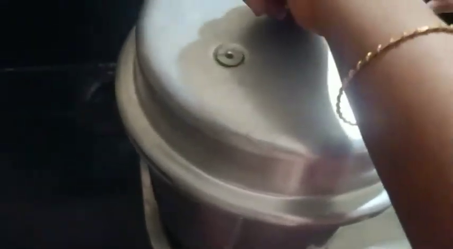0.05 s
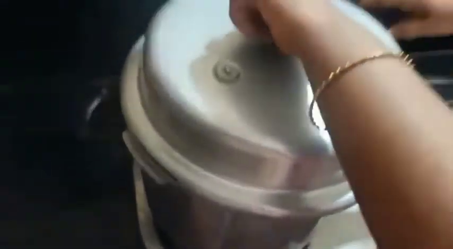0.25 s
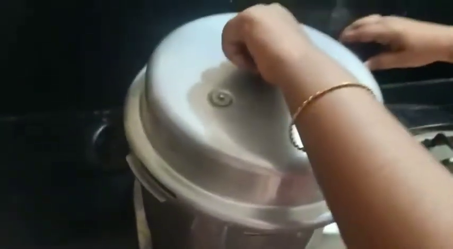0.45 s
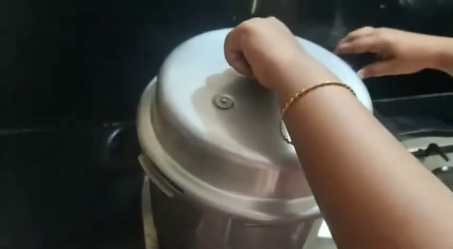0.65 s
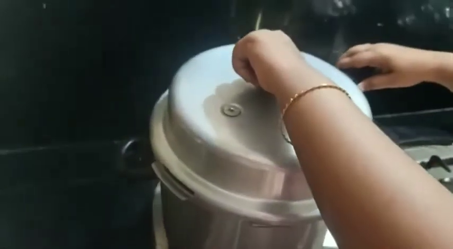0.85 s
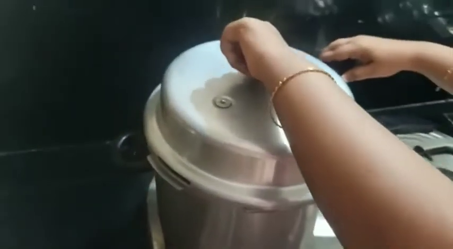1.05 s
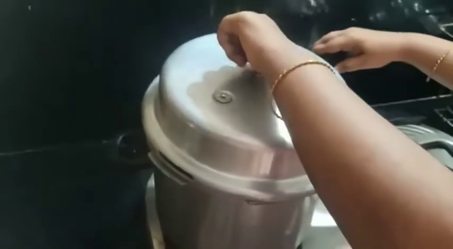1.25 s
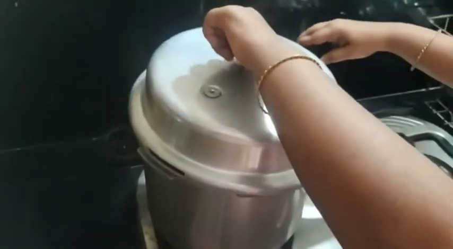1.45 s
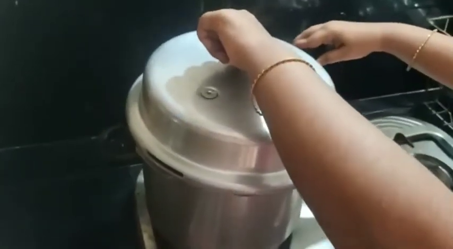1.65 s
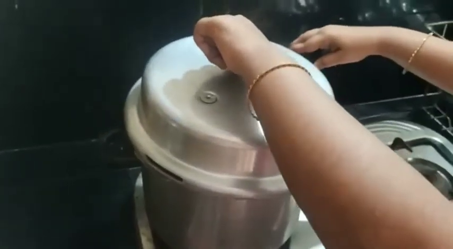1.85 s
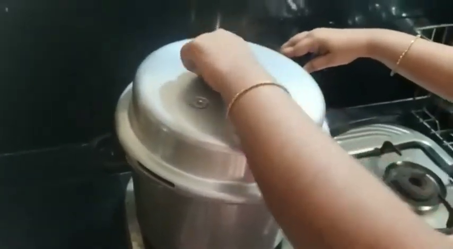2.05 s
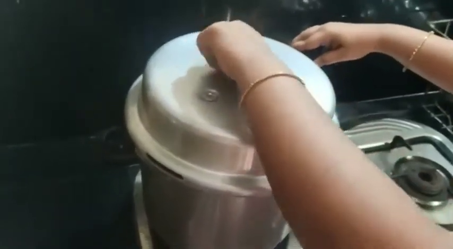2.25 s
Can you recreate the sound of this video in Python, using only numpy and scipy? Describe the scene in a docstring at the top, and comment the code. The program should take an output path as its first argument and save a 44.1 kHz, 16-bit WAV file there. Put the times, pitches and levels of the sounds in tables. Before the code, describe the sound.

A heavy metal cooker lid clanks twice onto a pot rim, then scrapes and knocks until seated

```python
"""Quiet kitchen tone, a mains hum and hands rustling on metal; then a heavy cooker lid is dropped on a pot rim.
Two clanks follow, then smaller knocks and scrapes as the lid is worked round until it seats.
Clicks and grit excite modes of lid and pot; the pot wall hums on a beating pair of low modes.
Rubs and room tone are filtered noise; a sine thud of the worktop lies under each blow.
Heard by two spaced microphones, with the deep bass of the metal and its reflections cut."""
import sys
import numpy as np
from scipy import signal
from scipy.fft import rfft, irfft, next_fast_len
from scipy.io import wavfile

SR = 44100
rng = np.random.default_rng(int(sys.argv[2]) if len(sys.argv) > 2 else 0)


def gain_from_db(level_db):
    """Convert decibel levels to linear amplitude factors (20 dB per decade)."""
    decades = np.asarray(level_db, float) / 20
    return 10 ** decades


def generate_wav(sig):
    """Save sig (samples, or channels by samples) to the path in sys.argv[1] as 16-bit PCM at SR."""
    pcm = np.round(np.clip(np.atleast_2d(sig).T, -1, 1) * 32767).astype(np.int16)
    wavfile.write(sys.argv[1], SR, pcm)


N = 101429

# Where the lid meets the pot.
PLACES = ("near", "far", "seated")
# Blows of lid on pot. Each row: start in seconds, level in dB, chatter length in seconds,
# brightness in dB per octave, place.
BLOWS = [(0.2137, -49, .01, -2.5, "seated"), (0.2488, -16, 0.027, -0.63, "near"),
         (0.3454, -21, 0.017, 0.35, "far"), (0.542, -38.5, 0.012, -2.2, "seated"),
         (0.917, -79, 0.004, 2.5, "seated"), (1.0215, -48.5, .004, -2.5, "seated"),
         (1.2238, -45.5, 0.0051, 0.4, "seated"), (1.3738, -37.5, 0.0132, -0.6, "seated"),
         (1.6308, -31.5, 0.011, -2.03, "seated"), (2.262, -56.5, 0.003, 3.5, "seated")]


def rms_one(x):
    """Scale to rms 1."""
    return x / np.sqrt(np.mean(x ** 2) + 1e-20)


def at_hz(points, hz):
    """Read a table of (Hz, value) on a log-frequency axis."""
    table = np.array(points)
    return np.interp(np.log(hz), np.log(table[:, 0]), table[:, 1])


def band(x, low_hz, high_hz):
    """Band-pass each channel."""
    return signal.sosfilt(signal.butter(2, [low_hz, high_hz], "band", fs=SR, output="sos"), x)


def drift(rate_hz):
    """Slow chance with spread 1: noise through two equal poles, computed every 40 samples."""
    pole = np.exp(-2 * np.pi * rate_hz * 40 / SR)
    noise = rng.standard_normal(N // 40 + 2002)
    slow = signal.lfilter([1], [1, -2 * pole, pole * pole], noise)[2000:]
    return np.interp(np.arange(N) / 40, np.arange(len(slow)), rms_one(slow))


def banded_noise(spectrum, patchy_db):
    """Half-octave bands of stereo noise, each with its own level, flicker and likeness; rms 1."""
    # Each row: frequency in Hz, left-right likeness (1 = identical).
    likeness = [(60, 0.27), (180, 0.99), (550, 0.36), (1650, 0.023), (4970, 0.0071), (15000, 0.0067)]
    out = 0
    edges_hz = 25 * 2 ** np.arange(0, 9.6, .5)
    white = rng.standard_normal((2, 2, N))
    for k, (low_hz, high_hz) in enumerate(zip(edges_hz, edges_hz[1:])):
        hz = np.sqrt(low_hz * high_hz)
        if spectrum[0][0] <= hz <= spectrum[-1][0]:
            mid, side = band(white[k % 2], low_hz, high_hz)   # neighbouring bands use separate noise
            alike = np.clip(at_hz(likeness, hz), -1, 1)
            stereo = np.sqrt(1 + alike) * mid + np.sqrt(1 - alike) * side * [[1], [-1]]
            out = out + gain_from_db(at_hz(spectrum, hz) + patchy_db * drift(6.4)) * stereo
    return rms_one(out)


def room_tone():
    """Quiet kitchen: noise of fixed spectrum with a slight flicker in each band."""
    # Each row: frequency in Hz, relative density in dB per Hz.
    room_spectrum = [(25, -9), (50, -19), (90, -3), (140, -13), (240, -0.5), (400, -6), (700, -1.5),
                     (1100, -15), (1600, -8.5), (2400, -7.5), (3500, -16), (5600, -17), (7500, -27),
                     (10000, -30), (15500, -42)]
    return gain_from_db(-56) * banded_noise(room_spectrum, patchy_db=0.63)


def mains_hum():
    """A steady sine at twice the mains frequency."""
    hum_hz, hum_db = 100, -68
    return gain_from_db(hum_db) * np.sin(2 * np.pi * hum_hz * np.arange(N) / SR)


def hands():
    """Each rub is noise in a broad resonance with a finer hiss; it rises fast, holds and fades."""
    # Rubs of the metal. Each row: start in seconds, length in seconds, resonance level in dB,
    # its pitch in Hz, hiss level in dB.
    rubs = [(.005, 0.058, -55, 2310, -88), (0.013, 0.081, -54, 5360, -69), (0.155, 0.084, -69, 5500, -73),
            (0.302, 0.054, -36, 5330, -76), (0.457, 0.13, -61, 5100, -75), (0.634, 0.027, -66, 5460, -73),
            (0.779, 0.038, -70, 5500, -70.5), (0.903, 0.033, -64, 2530, -89),
            (1.013, 0.026, -68, 5500, -76), (1.095, .12, -77, 5200, -90), (1.325, .07, -64.5, 5600, -68),
            (1.38, .06, -67, 5700, -82), (1.462, 0.04, -56, 5500, -83), (1.455, 0.043, -53, 2950, -87),
            (1.538, 0.049, -53.5, 5520, -65), (1.63, 0.13, -63, 5430, -78), (1.697, 0.13, -63.5, 5100, -77),
            (1.876, 0.07, -60, 4800, -80), (1.936, 0.106, -64, 5600, -66.5), (2.049, 0.063, -55, 5100, -66),
            (2.094, 0.13, -54.5, 2673, -98.5), (2.143, 0.12, -56.5, 5500, -66), (2.24, .05, -65, 5000, -80)]
    # Fine hiss. Each row: frequency in Hz, relative density in dB per Hz.
    hiss_spectrum = [(5000, -33), (7500, -21), (9500, -3.5), (12000, 15), (14000, -5.5), (15500, 10)]
    width_share, rise_s, fade_s = .3, 0.0027, 0.038   # width as a share of the pitch
    out = np.zeros((2, N))
    white = rng.standard_normal((2, N))
    hiss = banded_noise(hiss_spectrum, patchy_db=2.5)
    for start_s, length_s, rub_db, hz, hiss_db in rubs:
        span = slice(int(start_s * SR), int((start_s + length_s + 6 * fade_s) * SR))
        t = np.arange(N)[span] / SR - start_s
        rub = rms_one(band(white[:, span], hz * (1 - width_share / 2), hz * (1 + width_share / 2)))
        envelope = (1 - np.exp(-t / rise_s)) * np.exp(-np.maximum(t - length_s, 0) / fade_s)
        out[:, span] += (gain_from_db(rub_db) * rub + gain_from_db(hiss_db) * hiss[:, span]) * envelope
    return out


def ring(place, count=320):
    """Stereo rings after a unit click at one place: the strong modes, and the crowd of weak ones."""
    # Strong modes of lid and pot. Each row: frequency in Hz, relative level in dB struck near,
    # struck far and with the lid seated, t60 in seconds.
    strong_modes = np.array([(194, -6, -10, -15, .3), (356, -4, -6, -5, .2), (400, -12, -10, -17, .28),
                             (455, -11, -14, -13, .22), (500, -15, -10, -7, .22), (535, 0, -8, -11, .21),
                             (565, -11, -13, -9, .25), (607, -14, -4, -10, .2), (650, -20, -15, -10, .3),
                             (738, -5, -1, -12, .29), (770, -12, -10, -10, .24), (842, -5, 1, -11, .29),
                             (866, -6, -6, -16, .25), (982, -14, -10, -1, .22), (1068, -13, -20, -22, .2),
                             (1250, -12, -14, -10, .26), (1281, -10, -5, -19, .23),
                             (1383, -1, -7, -11, .19), (1450, -9, -8, -14, .2), (1521, 0, -9, -16, .16),
                             (1585, -22, -13, -22, .2), (1793, -24, -16, -24, .2),
                             (2106, -7, -11, -18, .25), (2257, -6, -10, -20, .22), (2290, -7, -10, -8, .22),
                             (2335, -4, 0, -11, .2), (2390, -12, -6, -22, .25), (2610, -18, -15, -19, .23),
                             (2750, -21, -22, -15, .22), (2990, -11, -15, -16, .22),
                             (3119, -4, -9, -22, .26), (3670, -22, -15, -26, .2), (3920, -16, -14, -21, .2),
                             (4090, -20, -8, -24, .16), (4256, -9, -17, -21, .16),
                             (4590, -20, -24, -30, .16), (4800, -14, -16, -27, .18),
                             (4915, -22, -17, -29, .2), (5500, -22, -17, -30, .18),
                             (5800, -20, -17, -30, .18)])
    # Weak modes together. Each row: frequency in Hz, relative density in dB per Hz.
    crowd_spectrum = [(250, -12.5), (600, -11.5), (1000, -9), (1400, -0.5), (1800, -11.5), (2400, -0.5),
                      (3500, -8), (5000, -7), (6300, -13), (7500, -25), (10000, -33), (15000, -38)]
    # Decay of the weak modes. Each row: frequency in Hz, t60 in seconds before the cap below.
    crowd_t60 = [(250, 0.54), (1000, 0.2), (3000, 0.15), (6000, 0.11), (12000, 0.16)]
    crowd_db, apart_hz = -19, 1190
    contact_s, bloom_s, bloom_share = 0.00059, 0.0037, 0.39
    t = np.arange(SR // 2) / SR

    roots = np.linspace(crowd_spectrum[0][0] ** .5, crowd_spectrum[-1][0] ** .5, count)
    crowd_hz = (roots + rng.uniform(-.15, .15, count)) ** 2
    spacing_db = 5 * np.log10(crowd_hz / 1000)   # modes lie farther apart higher up
    crowd_level_db = crowd_db + at_hz(crowd_spectrum, crowd_hz) + spacing_db + rng.normal(0, 3, count)

    hz = np.r_[strong_modes[:, 0], crowd_hz]
    level_db = np.r_[strong_modes[:, 1 + PLACES.index(place)], crowd_level_db]
    t60_s = np.clip(np.r_[strong_modes[:, 4], at_hz(crowd_t60, crowd_hz)], .02, .5)

    # From apart_hz up, the two microphones hear a mode a quarter cycle apart.
    phase = rng.choice([-1, 1], len(hz)) * np.pi / 4 * np.minimum(hz / apart_hz, 1)
    weight = gain_from_db(level_db) * rng.choice([-1, 1], len(hz)) * np.exp(1j * phase * [[1], [-1]])
    wave = np.exp(np.float32(t)[:, None] * np.complex64(2j * np.pi * hz - np.log(1000) / t60_s))
    # The contact rises smoothly; the cosine brings the ring to zero at its end.
    edges = np.sin(np.pi / 2 * np.minimum(t / contact_s, 1)) ** 2 * np.cos(np.pi * t)

    def sum_modes(part):
        return (np.complex64(weight[:, part]) @ wave[:, part].T).imag * edges

    strong = sum_modes(slice(0, len(strong_modes)))
    weak = sum_modes(slice(len(strong_modes), None))
    bloom = 1 - bloom_share * np.exp(-t / bloom_s)   # part of a strong mode builds up after contact
    return strong * bloom, weak


def add(out, start_s, clicks, body, tilt_db):
    """Convolve clicks with a ring, tilt by dB per octave about 1 kHz, mix into out."""
    size = next_fast_len(len(clicks) + body.shape[1])
    hz = np.maximum(np.arange(size // 2 + 1) * SR / size, 100)
    tilt = gain_from_db(tilt_db * np.log2(hz / 1000))
    start = int(start_s * SR)
    sound = irfft(rfft(clicks, size) * rfft(body, size) * tilt, size)[:, :N - start]
    out[:, start:start + sound.shape[1]] += sound


def grit(length_s, clicks_per_s):
    """Uneven clicks of random sign, of energy 1 in all."""
    chance, sign, size = rng.random((3, SR // 4))[:, :int(length_s * SR) + 1]
    clicks = (chance < clicks_per_s / SR) * np.sign(sign - .5) * gain_from_db(-3.0 * np.log(size + 0.015))
    return clicks / np.sqrt(np.sum(clicks ** 2) + 1e-9)


def lid_slides(rings):
    """The lid slides on the rim: a swell of grit excites every mode of the seated lid."""
    # Each row: start in seconds, length in seconds, level in dB, brightness in dB per octave.
    slides = [(0.018, 0.17, -42.5, -3), (.18, 0.091, -45, 4), (.55, 0.11, -47, -3.5),
              (1.229, 0.077, -50.5, -0.5), (1.388, 0.048, -40, -0.8), (1.445, 0.043, -46.5, 1),
              (1.702, 0.086, -42, -1.2), (1.849, 0.11, -52, 4.8)]
    out = np.zeros((2, N))
    for start_s, length_s, db, tilt_db in slides:
        clicks = grit(length_s, clicks_per_s=1700)
        swell = np.sqrt(np.hanning(len(clicks)))
        add(out, start_s, gain_from_db(db) * clicks * swell, sum(rings["seated"]), tilt_db)
    return out


def pot_wall():
    """Two neighbouring modes start opposed and beat, wavering a little; the next grip damps them."""
    # Pushes of the wall. Each row: start in seconds, upper mode level in dB,
    # lower mode against upper in dB, t60 in seconds, time held free in seconds.
    pushes = [(0.044, -46, -7.5, 0.31, 0.059), (.118, -42.5, -1, 0.33, 0.04),
              (0.193, -51.5, 8.5, .4, 0.038), (0.229, -31, -7, .4, 0.023), (0.25, -15.5, -3.5, 0.17, 0.042),
              (0.344, -34, 16, 0.2, 0.44), (0.5356, -31.5, 0.8, 0.85, 0.071),
              (.6020, -42.5, -3.5, 0.47, 0.18), (1.022, -49, -4, 0.56, 0.073),
              (1.235, -42.5, -22, 1.3, 0.077), (1.379, -38.5, -15, 0.59, .08), (1.469, -55, -23, .6, 0.07),
              (1.631, -31, -7.5, .6, 0.11), (1.729, -31, -6, 0.5, 0.069), (1.829, -52.5, -11, 0.82, 0.086),
              (1.918, -46.5, -11, 0.47, .25)]
    upper_hz, lower_hz, rise_s, damp_s = 262.6, 231, 0.0054, 0.0045
    waver_share = .012   # the grip bends the pitch by this share, rms
    out = 0
    bent_s = np.cumsum(1 + waver_share * drift(11.5)) / SR
    for start_s, db, lower_db, t60_s, free_s in pushes:
        t = np.maximum(np.arange(N) / SR - start_s, 0)
        turn = 2 * np.pi * np.maximum(bent_s - bent_s[int(start_s * SR)], 0)
        decay = gain_from_db(db - 60 * t / t60_s) * np.exp(-np.maximum(t - free_s, 0) / damp_s)
        envelope = (1 - np.exp(-t / rise_s)) * decay
        out = out + envelope * (np.sin(upper_hz * turn) - gain_from_db(lower_db) * np.sin(lower_hz * turn))
    return out


def lid_blows(rings):
    """A blow is one contact that rings every mode, then a chatter that stirs the crowd."""
    chatter_per_s, chatter_db = 1200, 1   # energy against the contact, before the taper
    out = np.zeros((2, N))
    for start_s, db, length_s, tilt_db, place in BLOWS:
        strong, weak = rings[place]
        clicks = grit(length_s, chatter_per_s) * gain_from_db(chatter_db)
        clicks *= np.linspace(1.2, .7, len(clicks))
        clicks[0] = 1   # the contact itself
        add(out, start_s, gain_from_db([db]), strong, tilt_db)
        add(out, start_s, gain_from_db(db) * clicks, weak, tilt_db)
    return out


def kitchen(x):
    """Reflections: dulled noise that dies away, unrelated in the two channels."""
    t60_s, cut_hz = 0.42, 5400
    t = np.arange(SR // 2) / SR
    tail = rng.standard_normal((2, len(t))) * gain_from_db(-60 * t / t60_s) * (t > .004)
    tail = signal.sosfilt(signal.butter(1, cut_hz, fs=SR, output="sos"), tail)
    tail = tail / np.sqrt(np.sum(tail ** 2) / 2)
    return signal.fftconvolve(x, tail, axes=1)[:, :N]


def worktop():
    """The worktop answers each blow with a dull thud, a decaying low sine."""
    thud_hz, thud_db, t60_s = 84, -32.5, 0.32   # level against the blow
    start_s = np.array([[row[0]] for row in BLOWS])
    blow_db = np.array([[row[1]] for row in BLOWS])
    t = np.maximum(np.arange(N) / SR - start_s, 0)
    thuds = gain_from_db(thud_db + blow_db - 60 * t / t60_s) * np.sin(2 * np.pi * thud_hz * t)
    return np.sum(thuds, axis=0)


def scene():
    """Cooker with its reflections, worktop, hands, room tone and hum."""
    reflections_db, bass_cut_hz, left_db = -18.5, 142, 0.86
    rings = {place: ring(place) for place in PLACES}
    metal = lid_slides(rings) + lid_blows(rings)
    cooker = metal + gain_from_db(reflections_db) * kitchen(metal) + pot_wall()
    cooker = signal.sosfilt(signal.butter(4, bass_cut_hz, "high", fs=SR, output="sos"), cooker)
    balance = gain_from_db([[left_db], [-left_db]])
    return (cooker + worktop() + hands()) * balance + room_tone() + mains_hum()


def low_pass(x):
    """Removes everything above the highest recorded frequency."""
    return signal.sosfilt(signal.butter(12, 15700, fs=SR, output="sos"), x)


def record(dry):
    """The finished mix as the phone keeps it."""
    return low_pass(dry)


dry = scene()
out = record(dry)
generate_wav(out)
```